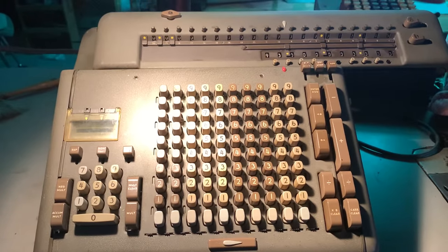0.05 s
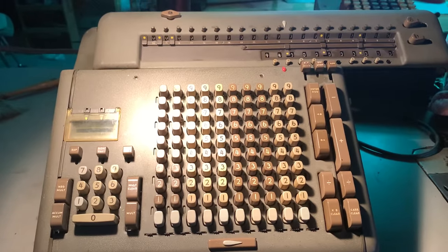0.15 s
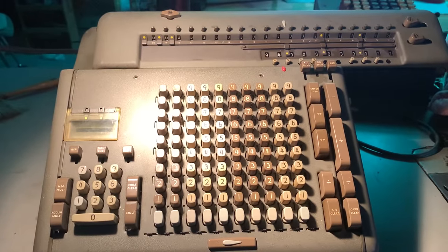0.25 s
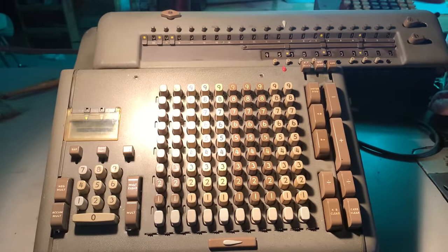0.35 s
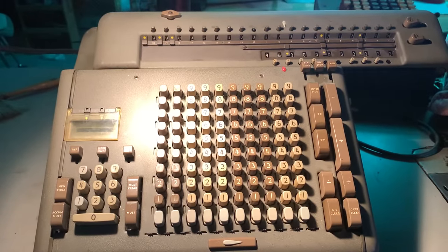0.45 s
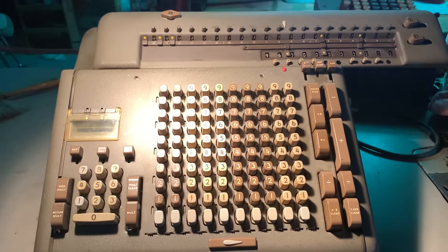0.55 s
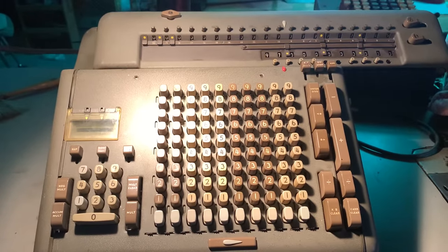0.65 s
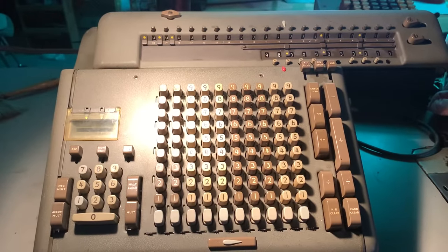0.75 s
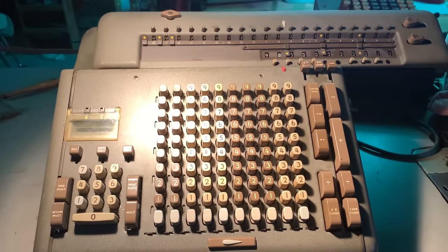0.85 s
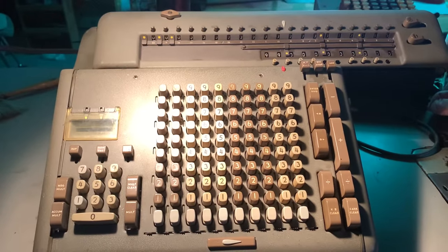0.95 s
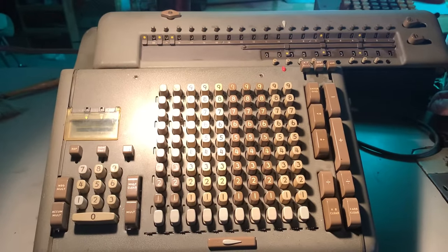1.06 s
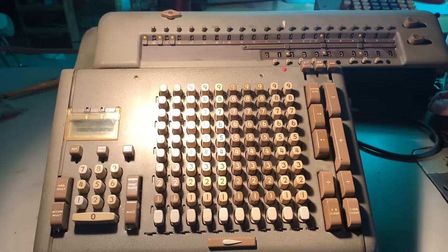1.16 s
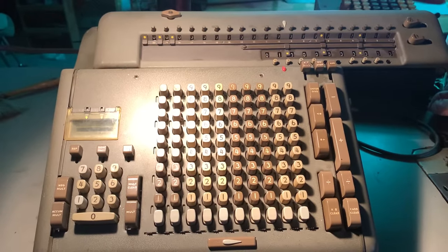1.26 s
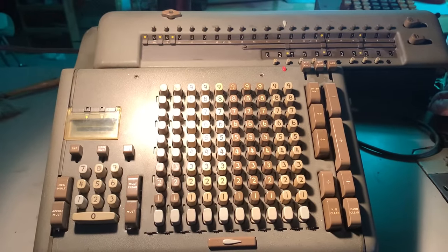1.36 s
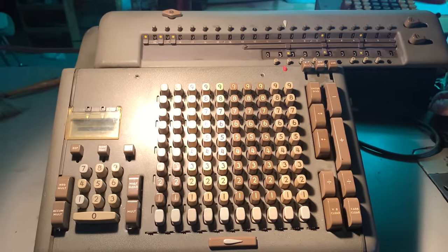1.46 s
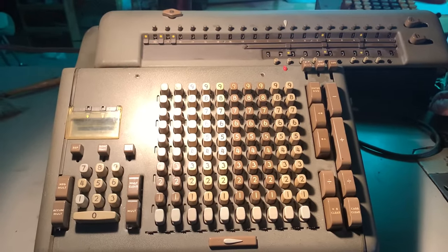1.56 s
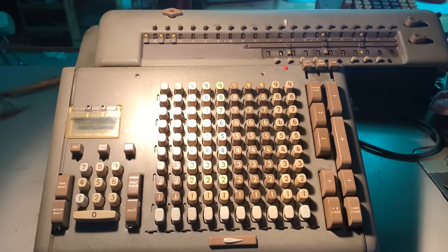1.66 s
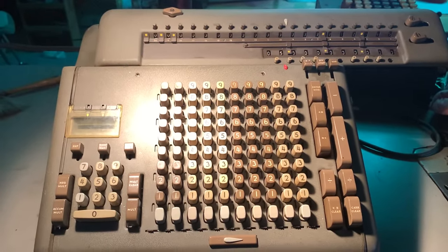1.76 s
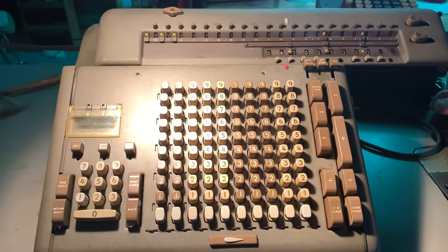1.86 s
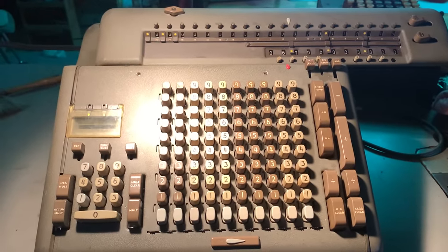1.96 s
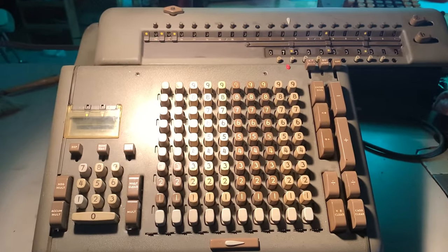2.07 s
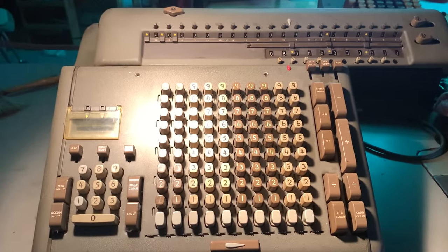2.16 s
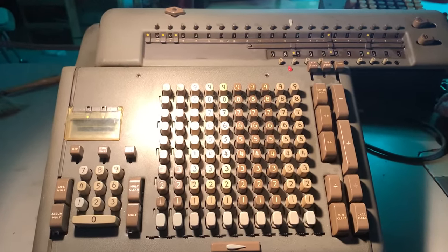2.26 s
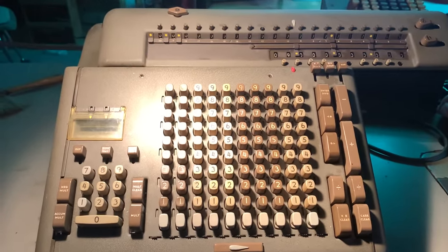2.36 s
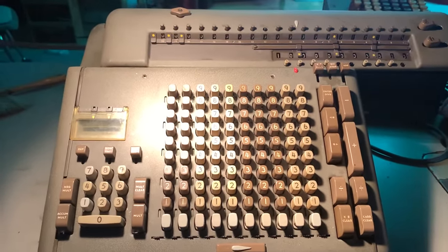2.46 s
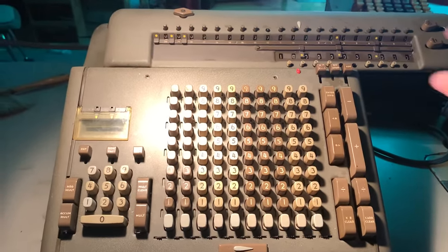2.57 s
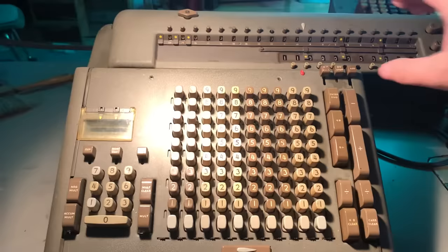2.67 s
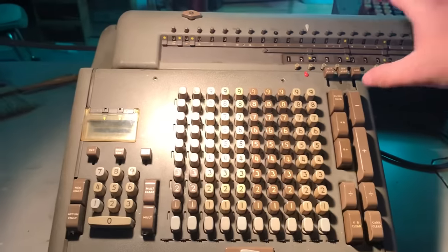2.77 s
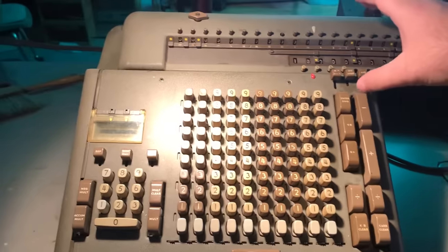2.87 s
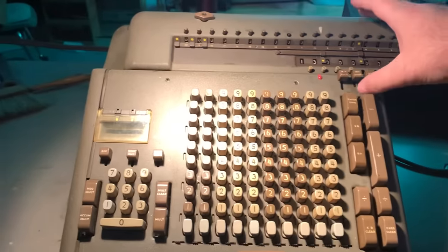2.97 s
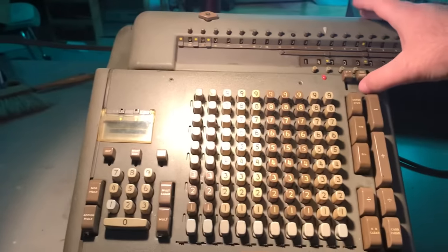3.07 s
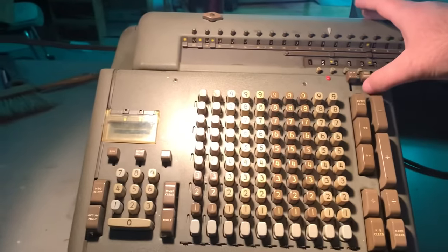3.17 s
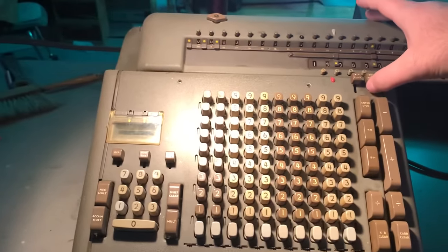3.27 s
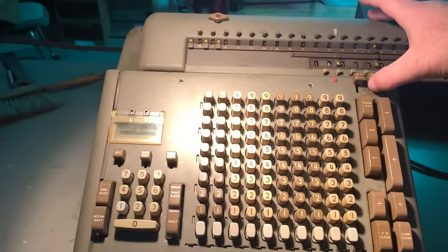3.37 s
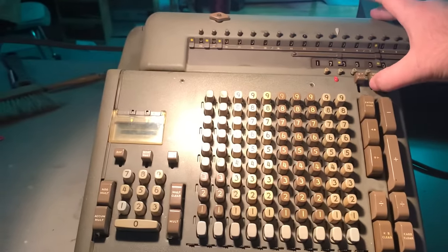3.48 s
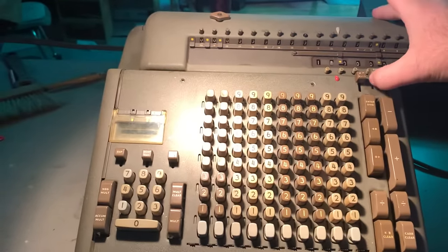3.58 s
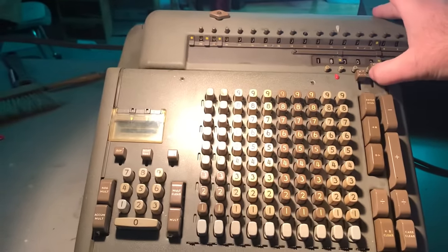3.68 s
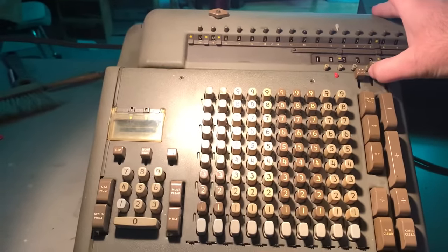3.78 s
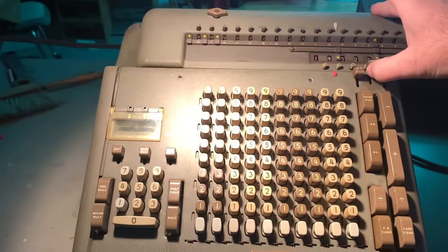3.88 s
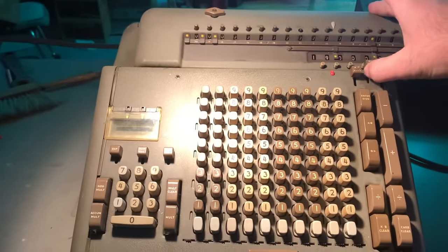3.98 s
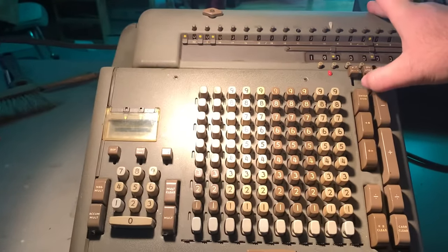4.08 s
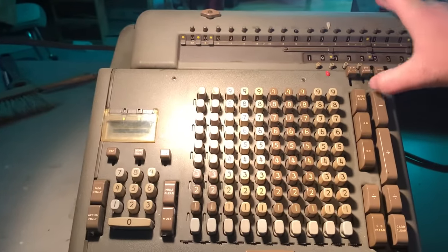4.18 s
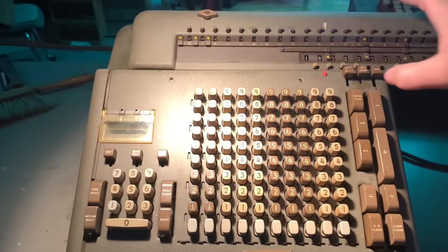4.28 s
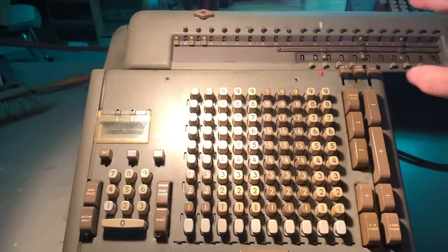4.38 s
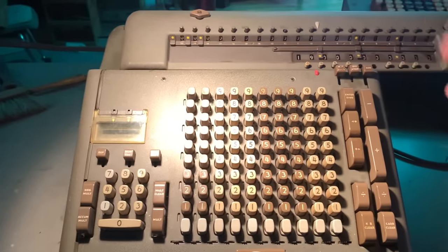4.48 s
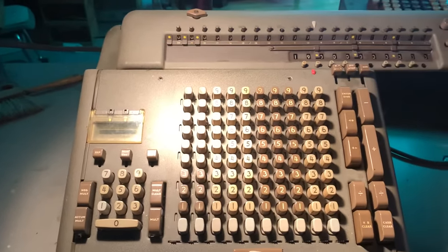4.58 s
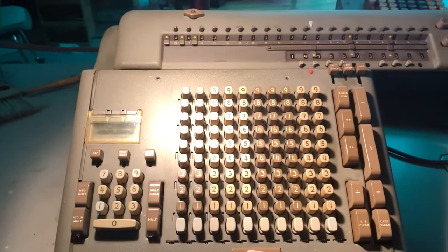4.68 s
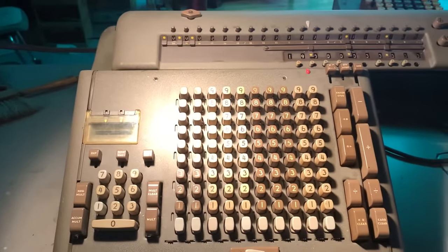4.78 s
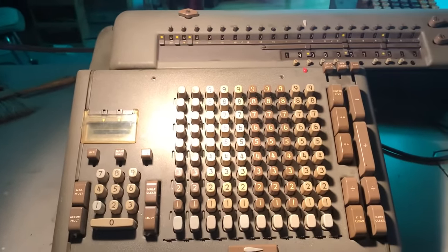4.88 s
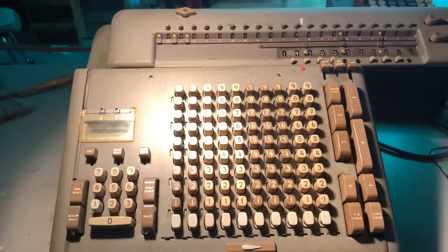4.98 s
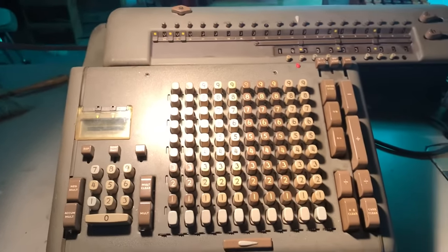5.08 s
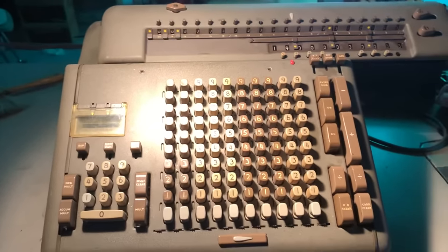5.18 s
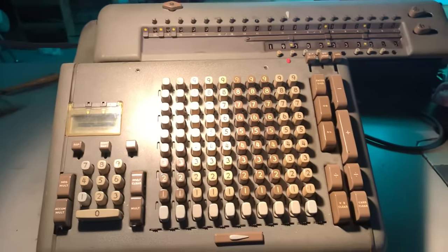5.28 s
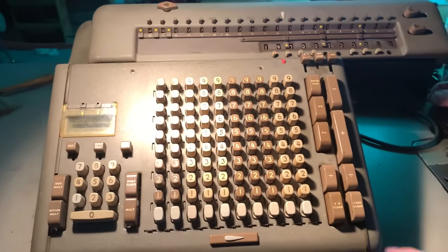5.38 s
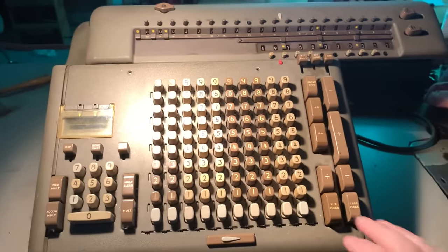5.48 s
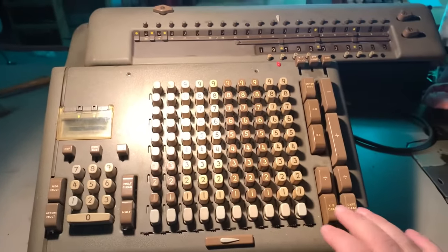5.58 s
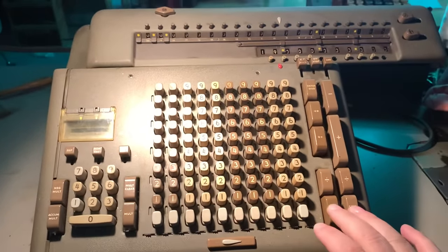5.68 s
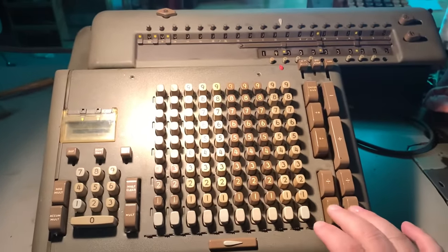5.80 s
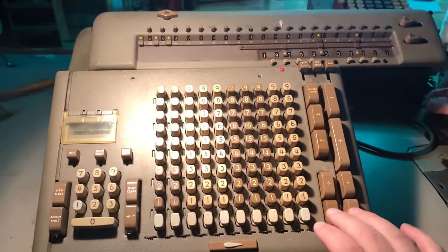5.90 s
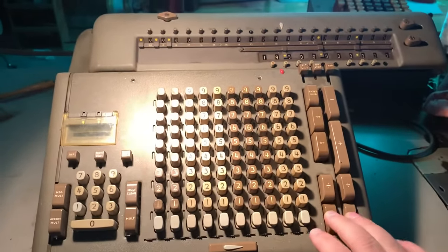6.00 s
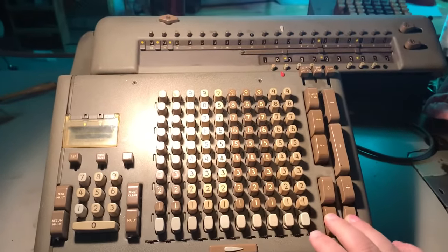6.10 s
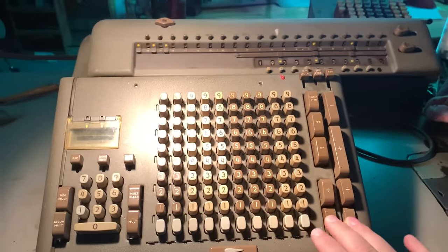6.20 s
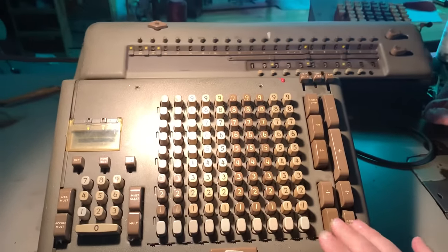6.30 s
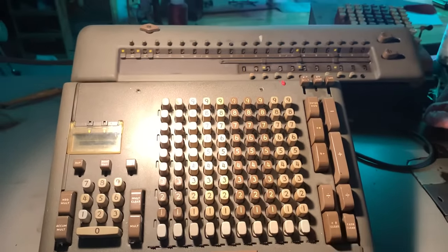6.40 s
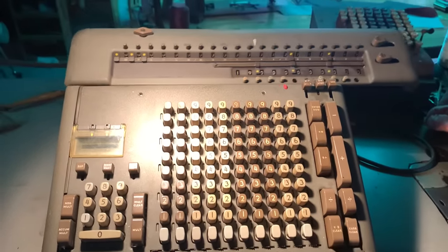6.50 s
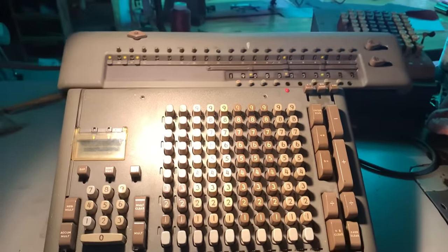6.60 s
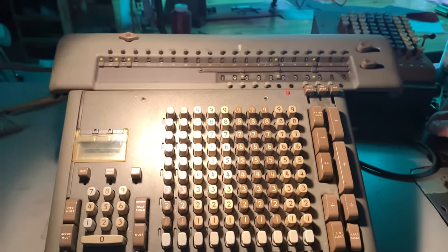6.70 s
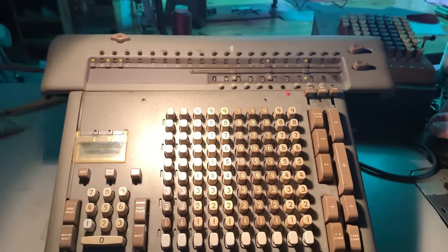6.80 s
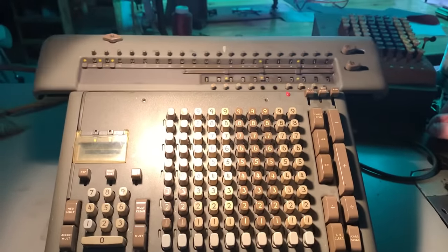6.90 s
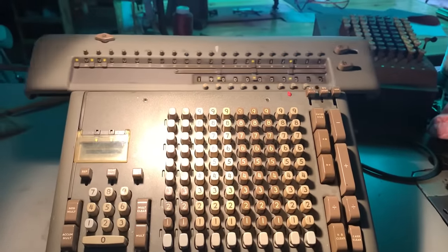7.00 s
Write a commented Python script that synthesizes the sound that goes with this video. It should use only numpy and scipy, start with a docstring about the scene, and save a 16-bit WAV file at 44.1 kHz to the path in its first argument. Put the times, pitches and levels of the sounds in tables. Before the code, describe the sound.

Close on a table, an old motorized calculating machine runs from the start: dense, bright steel clatter repeating about seven times a second over gear whirr and case rumble. Near four seconds a lever clacks hard, the machine stops, and a few slowing clicks fade. A quiet workshop hum remains, with faint hiss and a tiny distant chirp. Then a key snaps, and the carriage shifts with uneven clunks and thuds to the end.

```python
"""Clatter of an electromechanical desk calculator looping on a table, close to a phone. Each main-shaft turn
trips latches, rattles the linkage and thumps the case: timed impulses drive ringing modes and shaped noise.
A lever stops it and the motor coasts down, a pawl clicking; a key restarts it and the carriage shifts
with snaps, pitched clunks and desk thuds. Behind: filtered workshop noise, a sine hum, two faint treble
swells and one far-off chirp, a gliding sine."""
import sys
import numpy as np
from scipy import signal
from scipy.fft import rfft, irfft
from scipy.io import wavfile
from scipy.ndimage import uniform_filter1d

SR = 44100
rng = np.random.default_rng(int(sys.argv[2]) if len(sys.argv) > 2 else 0)


def store_pcm(level_fs):
    """Save levels as 16-bit WAV."""
    pcm = np.round(np.clip(level_fs, -1, 1) * 32767).astype(np.int16)
    wavfile.write(sys.argv[1], SR, np.atleast_2d(pcm).T)


N = 310905
TIME = np.arange(N) / SR
FREQ = np.fft.rfftfreq(N, 1 / SR) + 1  # Hz, offset to keep the log finite

TURN_S = 0.14319  # one turn of the main shaft
LOOP_START_S, LOOP_END_S = 0, 3.78
MOTOR_OFF_S = 3.805
PAWL_START_S, PAWL_PER_S, PAWL_SLOWING_PER_S2 = 3.830, 41.4, 104.5  # first click, click rate, its loss
HEAVY_BELOW_HZ = 1800  # splits heavy bars from light levers

# the two microphones: (frequency [Hz], likeness [0-1], right leads [rad], left minus right [dB])
PORTS = [(100, .97, 0, 2), (400, .98, 0, 1.5), (800, .7, 0, 1.5), (1300, .8, 0, 2), (1900, .3, 3.14, 4),
         (4000, .3, 0, 1), (6300, .3, 0, -4), (7300, .8, 1.9, -2), (8500, .97, 3.14, 0),
         (10900, .92, 6.28, 0), (13400, .96, 9.42, 0), (15700, .9, 12.57, 0)]
# modes of the struck steel: (frequency [Hz], width [Hz], relative level [dB])
RINGS = [(624, 57, -11.5), (854, 80, -7.5), (1046, 46, 2.5), (1179, 72, 0.5), (1423, 41, 1.5),
         (1582, 110, -4.5), (2043, 93, 1), (2216, 69.8, 0), (2507, 98, -7.5), (2680, 90, -6),
         (3160, 140, -9.5), (3870, 119, -12), (4560, 160, -11.5), (6430, 160, -15), (7180, 89, -11)]


def undb(db):
    """Decibels to amplitude."""
    return 10 ** (np.asarray(db) / 20)


def over_hz(table, column=1):
    """A table column joined on a log-frequency axis."""
    rows = np.array(table, float)
    return np.interp(np.log(FREQ), np.log(rows[:, 0]), rows[:, column])


def unit(gain):
    """Scale a response so that white noise keeps its level."""
    return gain / np.sqrt(np.mean(np.abs(gain) ** 2))


def spikes(s, db):
    """One impulse an event."""
    out = np.zeros(N)
    at = (np.asarray(s) * SR).astype(int)
    keep = (at >= 0) & (at < N)
    np.add.at(out, at[keep], undb(db)[keep])
    return out


def fade(x, t60, hz=0):
    """Exponential ring-down over t60 seconds, turning at hz."""
    pole = np.exp((2j * np.pi * hz - np.log(1000) / t60) / SR)
    return signal.lfilter([1], [1, -pole], x)


def smear(x, size):
    """Spread impulses over size samples, as a contact of that length does."""
    return uniform_filter1d(x, size)


def walk(rate):
    """Random levels drawn every 1 / rate s and slewed; spread near 1."""
    k = int(SR / rate)
    held = np.repeat(rng.standard_normal(N // k + 1), k)
    return 1.2 * uniform_filter1d(held, k)[:N]


def ports(envelope, colour, like):
    """Noise under an envelope, heard by both microphones, alike as far as like says."""
    a, b = rfft(envelope * rng.standard_normal((2, N))) * colour
    like = np.clip(like, 0, 1)
    lead = np.exp(1j * over_hz(PORTS, column=2))
    right = like * a * lead + np.sqrt(1 - like ** 2) * b
    return irfft(np.array([a, right]), N)


def resonances(table):
    """Summed band-passes, neighbours in opposite sign."""
    total = 0
    for k, (f, w, db) in enumerate(table):
        detuning = (FREQ / f - f / FREQ) * f / w
        total = total + (-1) ** k * undb(db) / (1 + 1j * detuning)
    return unit(total)


def turns(table, start, end, jitter_s, scatter_db):
    """The pattern of one shaft turn, repeated with play in timing and force."""
    rows = np.array(table, float)
    begin = np.arange(start, end, TURN_S)
    rows = np.tile(rows, (len(begin), 1))
    rows[:, 0] += np.repeat(begin, len(table))
    chance = rng.standard_normal(rows.shape)
    rows[:, 0] += jitter_s * chance[:, 0]
    rows[:, 1:] += scatter_db * chance[:, 1:]
    return rows[rows[:, 0] < end]


def struck(events, modes, contact):
    """Blows lasting contact samples ring modes, each with a strength of its own at each microphone."""
    s, db = np.transpose(events)

    def ring(hz, mode_db, t60):
        blow_db = db + mode_db + 2.3 * rng.standard_normal(len(s))
        push = smear(spikes(s, blow_db), contact) * contact ** 0.5
        return fade(push, t60, hz).imag

    return np.array([sum(ring(*mode) for mode in modes) for _ in range(2)])


def steelwork(gears):
    """Latches crack in the treble, ring the steel and shake the linkage; gear teeth chatter underneath."""
    # latches on each looping turn:
    # (time into turn [s], ticks, light levers, heavy bars [relative dB])
    loop_latches = [(.0015, -23, -37.5, -28), (.0055, -50.5, -27.5, -31.5), (.0105, -38, -25.5, -32),
                    (.0135, -48.5, -29, -35), (.0165, -54.5, -34, -30), (.0225, -58.5, -35, -36.5),
                    (.029, -51.5, -43.5, -28), (.0335, -41.5, -39.5, -34), (.0378, -22.5, -26.5, -29),
                    (.0415, -45.5, -27.5, -24.5), (.0472, -61, -31, -25.5), (.0535, -28, -29, -31),
                    (.0565, -35, -22, -27.5), (.0625, -56, -41.5, -38), (.0655, -47, -32.5, -34),
                    (.0685, -30.5, -36, -32), (.074, -50, -38.5, -29.5), (.0790, -40, -29.5, -31.5),
                    (.1005, -35, -37, -32.5), (.1045, -31, -27, -33), (.108, -51.5, -31, -26.5),
                    (.1125, -61, -41, -31), (.123, -60.5, -46, -31), (.1320, -53, -30.5, -34),
                    (.139, -60.5, -39.5, -33)]
    # single blows of lever, pawl, key and carriage:
    # (time [s], ticks, light levers, heavy bars [relative dB])
    blows = [(3.685, -50, -21, -17.5), (3.703, -17, -23, -15), (3.761, -46, -23, -29.5),
             (3.785, -11.5, -8, -10.5), (3.7904, -18, -31, -15.5), (4.0076, -35, -31.5, -29),
             (5.8567, -55, -54, -57), (5.901, -37, -31.5, -55), (5.9486, -17, -20.5, -45.5),
             (5.958, -28, -29, -28.5), (6.005, -39, -35, -25), (6.016, -32, -34, -29.5),
             (6.191, -26, -36, -51), (6.2702, -39, -24, -33), (6.274, -41, -35.5, -31.5),
             (6.588, -28, -35.5, -19), (6.705, -34, -32, -38.5), (6.848, -49, -29, -39)]
    # colour of the crack: (frequency [Hz], relative level [dB per Hz])
    steel = [(1500, -20), (3000, -9), (5500, -10), (7100, -1), (8600, 0), (9500, -1), (11000, -7),
             (12500, -7), (13400, -3), (14300, -9), (15600, -5), (16000, -20), (17000, -24)]
    # linkage resonances, both: (frequency [Hz], width [Hz], relative level [dB])
    lever_modes = [(2073, 480, 0.5), (2855, 860, 2), (3067, 440, 3.5), (4250, 1830, -14)]
    bar_modes = [(606, 1280, -6.5), (1060, 176, 1), (1226, 136, 2), (1626, 500, 0)]

    looping = turns(loop_latches, LOOP_START_S, LOOP_END_S, jitter_s=0.0006, scatter_db=2.0)
    s, tick_db, lever_db, bar_db = np.vstack([looping, shifts(), pawl(), blows]).T
    ticks = smear(spikes(s, tick_db - 11.5), 44)  # a latch lands over about 1 ms
    chatter = mesh(gears, 350, 0.87) + undb(-50.5) * gears  # teeth over the even whirr of the bearings

    # a snap, a short crack, then the loose parts jingle on
    crack = undb(5.0) * fade(ticks, 0.006).real + fade(ticks, 0.028).real
    crack += undb(-16) * fade(ticks, 0.13).real
    crack += undb(-21.5) * fade(chatter, 0.04).real

    # brief noise bursts, so every clack has its own colour
    clink = smear(fade(spikes(s + 0.00036, lever_db + 2.5), 0.0069).real, 50)
    clack = smear(fade(spikes(s + 0.00036, bar_db + 2.5), 0.0069).real, 50)

    # the linkage takes the blow more slowly
    levers = smear(fade(spikes(s + 0.0011, lever_db - 17.5), 0.054).real, 70)
    levers += undb(-12.0) * fade(chatter, 0.036).real
    bars = smear(fade(spikes(s + 0.001, bar_db - 19), 0.06).real, 70)
    bars += undb(-11.5) * fade(chatter, 0.054).real

    like, rings = over_hz(PORTS), resonances(RINGS)
    layers = [
        (crack, unit(undb(over_hz(steel)))),
        (clink, rings * (FREQ >= HEAVY_BELOW_HZ)),
        (clack, rings * (FREQ < HEAVY_BELOW_HZ)),
        (levers, resonances(lever_modes)),
        (bars, resonances(bar_modes)),
    ]
    noise = sum(ports(envelope, colour, like) for envelope, colour in layers)
    return noise + pings(s, lever_db, bar_db)


def shifts():
    """Latch rows for the turns that shift the carriage, from the moment it moves."""
    # latches on each shifting turn:
    # (time into turn [s], ticks, light levers, heavy bars [relative dB])
    latches = [(0, -28, -34.5, -39), (.012, -37, -29.5, -25.5), (.0277, -23, -25.5, -25),
               (.0472, -24.5, -22, -29), (.058, -32, -27, -25.5), (.064, -25.5, -24.5, -28.5),
               (.078, -39, -35, -23), (.092, -34, -40.5, -29), (.100, -41.5, -43.5, -28.5),
               (.120, -57, -34, -36.5)]
    start_s, carriage_moves_s = 5.9244, 6.05
    rows = turns(latches, start_s, N / SR, jitter_s=0.0006, scatter_db=1.56)
    return rows[rows[:, 0] > carriage_moves_s]


def pawl():
    """Click rows of a pawl on the coasting ratchet wheel, which slows evenly."""
    first_db, change_db = (-58, -34, -35), (-1.5, -1.5, -1.2)  # relative tick, levers, bars; change per click
    k = np.arange(8)
    root = np.sqrt(PAWL_PER_S ** 2 - 2 * PAWL_SLOWING_PER_S2 * k)
    s = PAWL_START_S + (PAWL_PER_S - root) / PAWL_SLOWING_PER_S2
    return np.column_stack([s, np.array(first_db) + np.outer(k, change_db)])


def gear_level():
    """Gear drive: loaded while looping, fading as the motor coasts to rest, loaded again after the restart."""
    loop_db, coast_db, shift_db = -43.5, -46.5, -39.5  # relative
    coast_fade_db_per_s, motor_on_s, spin_up_s = 31.5, 5.947, 0.035
    rest_s = PAWL_START_S + PAWL_PER_S / PAWL_SLOWING_PER_S2
    coast = undb(coast_db - coast_fade_db_per_s * (TIME - MOTOR_OFF_S))
    coast = coast * np.clip((rest_s - TIME) / 0.18, 0, 1)
    # the motor spins up before the clutch bites: 20 dB per spin_up_s
    spin_up = undb(shift_db + 20 * (TIME - motor_on_s) / spin_up_s)
    coast = np.maximum(coast, spin_up)
    level = np.select([TIME < MOTOR_OFF_S, TIME < motor_on_s], [undb(loop_db), coast], undb(shift_db))
    return uniform_filter1d(level, size=SR // 100)


def mesh(level, rate, scatter_db):
    """Teeth meeting at random moments, rate a second, with uneven force."""
    chance = rng.random((int(rate * N / SR), 2))
    return level * spikes(chance[:, 0] * N / SR, -scatter_db * np.log(chance[:, 1]))


def pings(s, lever_db, bar_db):
    """Each blow also lands on one light and one heavy part, which sound their own mode clearly."""
    ping_db, half_range_db = -7, 5.0  # re the blow; uniform spread from blow to blow
    ring_ratio = 0.74  # ring length re that of the mode's width
    chance = rng.random((len(s), 4))
    heavy = sum(hz < HEAVY_BELOW_HZ for hz, _, _ in RINGS)
    bar = (chance[:, 0] * heavy).astype(int)
    lever = heavy + (chance[:, 1] * (len(RINGS) - heavy)).astype(int)
    ears_db = ping_db + half_range_db * (2 * chance[:, 2:].T - 1)
    out = 0
    for k, (hz, width, db) in enumerate(RINGS):
        hit, blow_db = (bar == k, bar_db) if k < heavy else (lever == k, lever_db)
        push = np.array([spikes(s[hit], (blow_db + ear + 0.61 * db)[hit]) for ear in ears_db])
        t60 = ring_ratio * np.log(1000) / (np.pi * width)
        out = out + fade(smear(push, 4), t60, hz).imag
    return out


def case(gears):
    """Cams, thumps and gear rumble push frame, cover and lid, which ring on their low modes."""
    # cam thumps on each looping turn: (time into turn [s], frame, cover [relative dB])
    loop_cams = [(.009, -22.5, -32.5), (.019, -25, -34.5), (.029, -24.5, -39.5), (.040, -34, -22),
                 (.054, -24, -30.5), (.066, -26.5, -25), (.076, -27.5, -20), (.089, -25, -33.5),
                 (.109, -22, -26.5), (.135, -31.5, -35)]
    # single thumps: (time [s], frame, lid [relative dB])
    thumps = [(2.348, -21, -23.5), (3.624, -25, -29), (3.704, -34, -18), (3.72, -12, -38),
              (3.77, -38, -22.5), (3.793, -7.5, -26), (4.024, -19, -56), (4.163, -27.5, -48),
              (4.2, -36, -46), (5.962, -23, -26.5), (5.996, -17, -37), (6.02, -27, -34), (6.1, -28, -23),
              (6.141, -15, -25), (6.162, -17, -38), (6.244, -29, -24), (6.275, -14, -30), (6.3, -22, -19),
              (6.389, -27, -22.5), (6.421, -20, -31), (6.431, -15, -19.5), (6.447, -27, -21.5),
              (6.53, -27, -25), (6.559, -30, -27), (6.580, -29, -21.5), (6.589, -33, -19),
              (6.600, -23, -23), (6.627, -29, -32), (6.673, -30, -24.5), (6.704, -30, -22),
              (6.728, -34, -23), (6.763, -30, -33), (6.817, -29, -19), (6.853, -37, -20), (6.881, -20, -32),
              (6.962, -38, -24.5), (6.99, -15, -26), (7.019, -40, -39)]
    # modes, both: (frequency [Hz], relative level [dB], t60 [s])
    frame = [(147.1, -20.5, 0.025), (204.5, -5, 0.092), (233, -1.5, 0.077), (267, 8, 0.057)]
    cover = [(310, 2, 0.046), (353.5, -0.5, 0.14), (373.6, -6.5, 0.19), (481, -6, 0.015), (607, -10, 0.021)]
    low_hz, top_hz = 136.2, 466
    right_late = 3  # samples

    cams = turns(loop_cams, LOOP_START_S, LOOP_END_S, jitter_s=0.0002, scatter_db=1.2)
    cam_s, frame_db, cover_db = cams.T
    thump_s, thump_db, lid_db = np.transpose(thumps)
    out = plate() + lid(thump_s, lid_db)
    for blow_db, modes in ((frame_db - 18, frame), (cover_db - 6.5, cover)):
        push = spikes(cam_s, blow_db) + undb(-23.5) * gears * rng.standard_normal(N)
        push = smear(push, int(0.0004 * SR))
        out = out + sum(undb(db) * fade(push, t60, hz).imag for hz, db, t60 in modes)
    jolt = smear(spikes(thump_s, thump_db - 15), int(0.00098 * SR))  # softer, longer contact
    out = out + sum(undb(db) * fade(jolt, t60, hz).imag for hz, db, t60 in frame)
    # the small case radiates no deep bass, and its padding swallows the click
    band = signal.butter(3, [low_hz, top_hz], "band", fs=SR, output="sos")
    out = signal.sosfilt(band, out)
    return np.array([out, np.roll(out, right_late)])


def lid(thump_s, thump_db):
    """Each single thump swings the lid's modes up over a few cycles, then they die away."""
    # lid modes at rest: (frequency [Hz], relative level [dB], t60 [s])
    modes = [(268, -7.5, 0.1), (301, -3, .07), (324.8, 3.5, 0.076), (363, -3.5, .06)]
    # pitch as the carriage travels, scaling all modes by its ratio to rest_hz: (time [s], pitch [Hz])
    pitch = [(5.96, 309), (6.1, 322), (6.3, 310), (6.44, 336), (6.6, 343), (6.7, 323), (7.04, 331)]
    rest_hz, rise_s = 327, 0.021
    t = TIME[:SR // 4, None]
    hz, mode_db, t60 = np.transpose(modes)
    swing = undb(mode_db + 4.5) * (undb(-60 * t / t60) - undb(-60 * t / rise_s))
    out = np.zeros(N)
    for when, db in zip(thump_s, thump_db):
        shift = np.interp(when, *np.transpose(pitch), left=rest_hz) / rest_hz
        ring = undb(db) * swing * np.sin(2 * np.pi * shift * hz * t)
        at = int(when * SR)
        out[at:at + len(t)] += ring.sum(axis=1)[:N - at]
    return out


def plate():
    """Wavering hum of a plate: steady until the motor is switched off, then a free ring decaying to the end."""
    running_hz, free_hz, t60_s = 196.2, 197.6, 3.8
    running_db, free_db = -38.5, -37
    after = np.maximum(TIME - MOTOR_OFF_S, 0)
    free = after > 0
    hz = np.where(free, free_hz, running_hz)
    waver_db = np.where(free, 1.8, 2.9) * walk(9.4)
    level_db = np.where(free, free_db, running_db) - 60 * after / t60_s + waver_db
    return undb(level_db) * np.sin(2 * np.pi * np.cumsum(hz) / SR)


def pawl_ring():
    """The pawl's own short, rough ring: it scrapes as it drops, shaking each mode with noise."""
    # pawl modes: (frequency [Hz], relative level [dB], t60 [s])
    modes = [(620, -55, .015), (1000, -51, .018), (1420, -47, .02), (1750, -54, .012), (2120, -47, .02),
             (2650, -51, .014)]
    fade_db_per_click, scrape_t60_s = -1.3, 0.022
    s = pawl()[:, 0]
    drops = spikes(s + 0.0013, fade_db_per_click * np.arange(len(s)))
    scrape = smear(fade(drops, scrape_t60_s).real, 170)
    out = 0
    for hz, db, t60 in modes:
        out = out + undb(db) * fade(scrape * rng.standard_normal((2, N)), t60, hz).imag
    return out


def carriage():
    """Key and carriage stop snap steel on steel; the carriage drops into notches with pitched clunks."""
    # events, both: (time [s], relative level [dB])
    snaps = [(5.9476, -22), (6.2679, -17)]
    clunks = [(6.02, -39), (6.142, -32), (6.298, -30.5), (6.447, -31), (6.591, -25.5), (6.728, -34),
              (6.875, -34), (7.02, -31)]
    # modes, both: (frequency [Hz], relative level [dB], t60 [s])
    snap_modes = [(1320, -23, .006), (3230, -4, 0.0058), (4020, -9, 0.0053), (6230, -3, 0.0044),
                  (10400, -4, 0.017), (11140, -8.5, 0.033)]
    clunk_modes = [(1010, -6, 0.029), (1216, -7.5, 0.088), (1393, -21, 0.067), (2185, -14, 0.066)]
    return struck(snaps, snap_modes, contact=2) + struck(clunks, clunk_modes, contact=9)


def desk():
    """The desk rings low under the heaviest jolts, the same at both microphones."""
    # thuds: (time [s], relative level [dB])
    thuds = [(3.79, -33.5), (5.965, -35), (6.0, -28.5), (6.16, -36), (6.29, -30), (6.6, -30.5), (6.82, -39)]
    # desk modes: (frequency [Hz], relative level [dB], t60 [s])
    modes = [(86, -13.5, 0.17), (116.8, -2.5, 0.26)]
    return struck(thuds, modes, contact=1).mean(axis=0)


def room(x, wet_db):
    """Walls return a decaying, duller wash, unrelated left and right."""
    t60_s, band_hz = 0.25, [300, 4770]
    t = TIME[:SR // 2]
    tail = rng.standard_normal((2, len(t))) * undb(-60 * t / t60_s) * (t > 0.006)
    tail = signal.sosfilt(signal.butter(1, band_hz, "band", fs=SR, output="sos"), tail)
    tail *= undb(wet_db) / np.sqrt(np.sum(tail ** 2, axis=1, keepdims=True))
    return x + signal.fftconvolve(x * np.ones((2, 1)), tail, axes=1)[:, :N]


def workshop():
    """Air of the room, noise swelling separately in each band, with hum, hiss and chirp."""
    # air spectrum: (frequency [Hz], relative level [dB per Hz])
    spectrum = [(15, -47), (25, -25.5), (55, -0.5), (100, -5.5), (260, -7.5), (400, -17), (575, -22.5),
                (980, -18), (1500, -29.5), (2100, -28.5), (2900, -41.5), (5500, -58), (7500, -58),
                (9000, -62), (12000, -59.5), (14000, -70), (16000, -78)]
    # likeness of the two microphones: (frequency [Hz], likeness [0-1])
    likeness = [(60, .95), (290, .9), (640, .25), (1400, .05), (15000, 0)]
    # edges of the separately swelling bands: (frequency [Hz])
    edges = [0, 180, 700, 1400, 3500, SR]
    air_db, hum_hz, hum_db = -46.5, 137.7, -53
    colour, like = unit(undb(over_hz(spectrum))), over_hz(likeness)
    air = 0
    for lo, hi in zip(edges, edges[1:]):
        swell = undb(air_db + 0.7 * walk(1.883) + 0.76 * walk(15))
        air = air + ports(swell, colour * (FREQ >= lo) * (FREQ < hi), like)
    hum = undb(hum_db + 1.2 * walk(0.98)) * np.sin(2 * np.pi * hum_hz * TIME)
    return air + hum + hiss() + room(chirp(), 2.2)


def hiss():
    """Two soft-edged, flickering swells of treble noise in the pause."""
    # swells: (time [s], length [s], level before flicker [dB])
    swells = [(4.1, 0.453, -72), (4.802, .42, -73.5)]
    # hiss spectrum: (frequency [Hz], relative level [dB per Hz])
    spectrum = [(1500, -14), (2100, -3), (3600, -12), (4600, 0), (5800, -9), (7500, 0), (8300, -10),
                (9000, -32), (16000, -60)]
    edge_s = 0.072
    level = sum(undb(db) * ((TIME > s) & (TIME < s + length)) for s, length, db in swells)
    level = uniform_filter1d(level, int(edge_s * SR)) * undb(2.5 * walk(9))
    return ports(level, unit(undb(over_hz(spectrum))), 0.3)


def chirp():
    """One far-off chirp: a sine gliding along a curve, its level fluttering."""
    # glide: (time [s], frequency [Hz], level before flutter [dB])
    curve = [(5.39, 2850, -84), (5.42, 3500, -76), (5.435, 4100, -77), (5.465, 4250, -76),
             (5.485, 3700, -76), (5.505, 3250, -73), (5.53, 3100, -84)]
    s, hz, db = np.transpose(curve)
    level = undb(np.interp(TIME, s, db, -200, -200))
    phase = 2 * np.pi * np.cumsum(np.interp(TIME, s, hz)) / SR
    return level * np.sin(phase) * undb(2.6 * walk(150))


def scene():
    """The machine in the room, the desk under it and the workshop behind."""
    gears = gear_level()
    machine = steelwork(gears) + case(gears) + pawl_ring() + carriage()
    return room(machine, wet_db=-22) + desk() + workshop()


def record(dry):
    """The phone's microphones differ in colour; the top is cut."""
    top_hz = 17100
    lean = undb(over_hz(PORTS, column=3) / 2)
    heard = irfft(rfft(dry) * np.array([lean, 1 / lean]), N)
    return signal.sosfilt(signal.ellip(8, 0.2, 70, top_hz, fs=SR, output="sos"), heard)


dry = scene()
out = record(dry)
store_pcm(out)
```